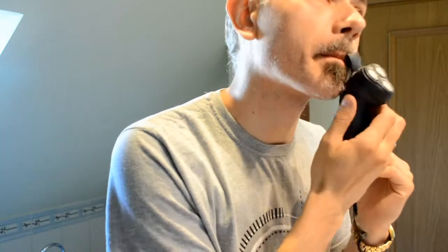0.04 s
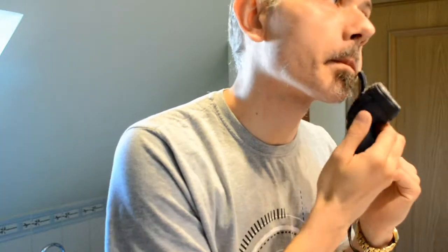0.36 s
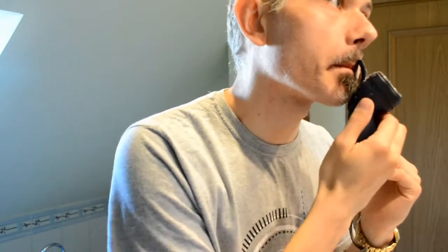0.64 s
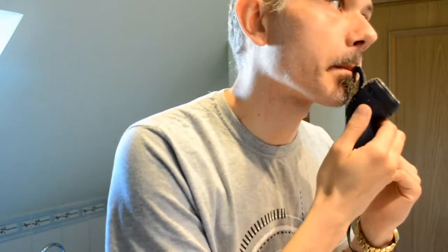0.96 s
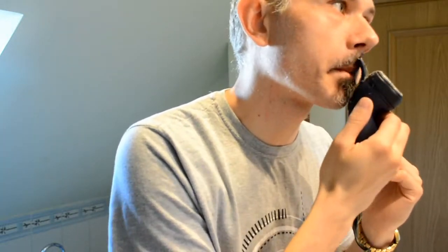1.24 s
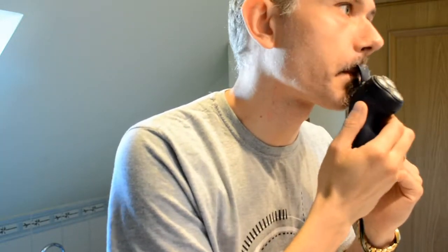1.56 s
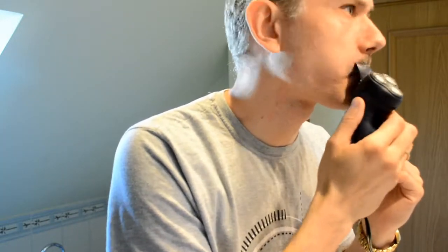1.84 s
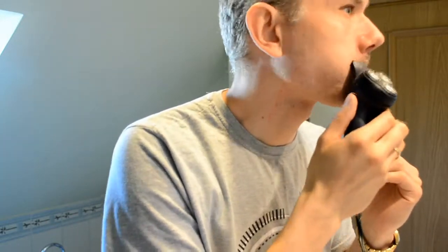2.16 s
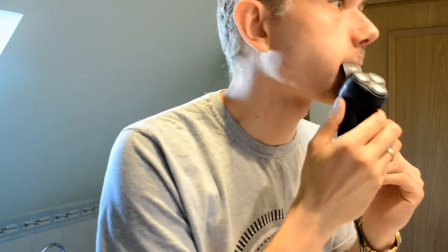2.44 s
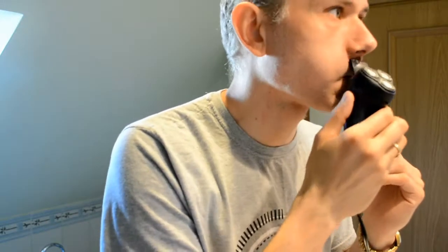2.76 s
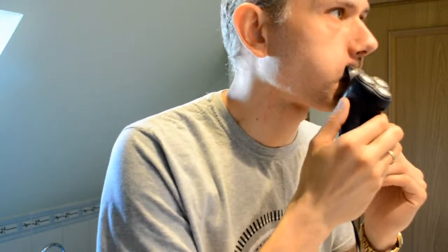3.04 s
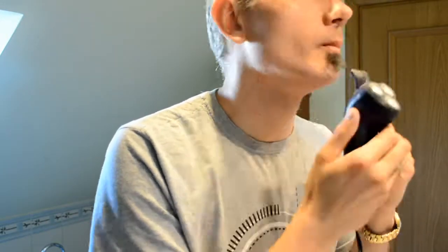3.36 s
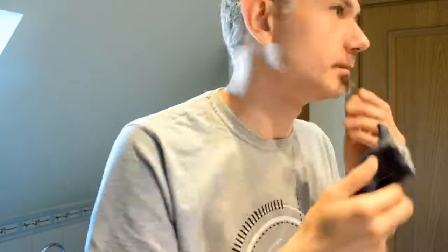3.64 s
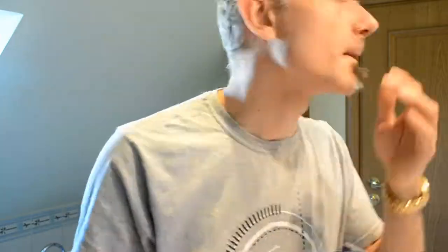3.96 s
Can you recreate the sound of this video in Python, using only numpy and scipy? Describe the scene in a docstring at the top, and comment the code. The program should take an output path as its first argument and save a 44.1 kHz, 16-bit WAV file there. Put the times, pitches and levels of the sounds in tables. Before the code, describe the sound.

An electric shaver buzzes steadily, rasping and crackling as it trims a moustache.

```python
"""An electric shaver trims a moustache in a small tiled room.
Gears and blades clatter in the plastic case, throbbing once a turn; the motor whines in wavering tones.
Short strokes rasp on the skin, hairs crack between the blades, the head bumps the lip.
Near the end the shaver is lifted off and lowered: the rasp dies, resonances shift, the free blades
squeal. Wall reflections widen the treble over a faint room rumble."""
import sys
import numpy as np
from scipy import signal
from scipy.fft import rfft, irfft
from scipy.io import wavfile

SR = 44100
rng = np.random.default_rng(int(sys.argv[2]) if len(sys.argv) > 2 else 0)


def put_to_file(sound):
    """Save the sound as 16-bit audio at rate SR, in the file named by the first command-line argument."""
    columns = np.atleast_2d(sound).T  # one column per channel
    safe = np.clip(columns, -1, 1)
    whole_steps = np.round(safe * 32767)
    wavfile.write(sys.argv[1], SR, whole_steps.astype(np.int16))


N = 176400

TURN_HZ, FIRST_TURN_S = 46.87, .016
CLATTER_PER_S, CHATTER_PER_S = 8000, 290
GEAR_DB, BLADE_DB = -36.5, -47.5
WOBBLE_RATIO, WOBBLE_PER_S = 0.00152, 23.4
JITTER_PER_S, FLUTTER_DB = 166, 1.2
RASP_PER_S, CRACKS_PER_S, SNIP_S = 3000, 5000, 0.0082
BUMP_HZ, BUMP_SPREAD_HZ = 236.3, 20
ROOM_T60_S, ECHO_DB, RUMBLE_DB = 0.13, -15, -80
LOWER_MID_S, LOWER_LENGTH_S, LOWERED_SIDE_DB = 3.66, .1, 2
LOWPASS_HZ = 15700

# Running noise of the gears: freq_hz, gain_db
GEAR_SPECTRUM = [(40, -41.5), (100, -33.5), (160, -23), (280, -17), (420, -20.5), (490, -10), (900, -3),
                 (1300, -7), (1750, 1), (2300, -1.5), (3600, -1), (5000, -10.5), (6500, -18), (15000, -38)]
# Blades sliding on the comb: freq_hz, gain_db
BLADE_SPECTRUM = [(500, -25), (3000, 0.5), (5500, 1.5), (7000, 1.5), (9800, -2), (11500, -7),
                  (13500, -15.5), (15700, -20.5)]
# Resonances of case and cutter: centre_hz, width_hz, gain_db
CASE_PEAKS = [(496, 66, 5.5), (712, 66, 4), (960.5, 47, 6.5), (1099, 89, 7), (1592, 53, 3.5),
              (1710, 79, 7.5), (1875, 100, 3.5), (2998, 130, 7.5), (3820, 120, 3), (4300, 120, 5.5),
              (4720, 320, 4), (5236, 150, 7), (5850, 130, 2.5), (9660, 450, 1)]
# Hollows between them: centre_hz, width_hz, gain_db
CASE_DIPS = [(4125, 310, -5.5), (5680, 480, -3), (7140, 240, -2)]
# Level as the shaver moves: time_s, gear_gain_db, blade_gain_db
DRIVE_GAINS = [(0, 0.5, 2), (.3, .5, -1), (.95, 0.5, 0), (1.95, 0, 0.5), (2.25, .5, -1.5), (3.35, 0, 1),
               (3.56, -0.5, 1), (3.65, 0, -0.5), (3.85, 0, -0.5), (4, -.5, -1.5)]
# Main whine sagging under load, sets relative motor speed: time_s, pitch_hz
WHINE_PITCH = [(0, 1697), (.2, 1716), (.3, 1708), (.4, 1717), (.75, 1700), (.93, 1716), (1.06, 1707),
               (1.16, 1701), (1.36, 1720), (1.6, 1716), (1.71, 1698), (1.82, 1712), (1.96, 1690),
               (2.15, 1702), (2.42, 1715), (2.95, 1702), (3.11, 1698), (3.28, 1728), (3.5, 1714), (4, 1720)]
# Motor and gear tones: mean_pitch_hz, jitter_ratio, [(time_s, level_db)]
MOTOR_TONES = [ (1703, 0.00318, [(0, -45), (.15, -45), (.55, -47), (.68, -41), (1.0, -45), (1.12, -38),
               (1.27, -51), (1.72, -40.5), (1.94, -46), (2.1, -43.5), (2.8, -45.5), (3.2, -41),
               (3.39, -46.5), (3.52, -39), (3.61, -38.5), (3.66, -51), (4, -47)]),
               (3022, .0022, [(0, -47.5), (.32, -44), (.47, -48), (.88, -43), (.96, -51), (1.15, -43.5),
               (1.28, -56), (1.38, -48), (1.8, -45.5), (2.2, -52), (3.2, -53), (3.46, -41.5), (3.57, -43),
               (3.65, -61), (4, -48)]), (1772, 0.0041, [(0, -58), (.3, -46.5), (.7, -52), (2.0, -49),
               (2.3, -45), (2.6, -53), (3.05, -51), (3.27, -49), (3.5, -73), (3.75, -54), (3.9, -47),
               (4, -52)]), (1103, .014, [(0, -54), (1.5, -58), (2.0, -58), (2.2, -48), (2.9, -51),
               (3.1, -69), (3.7, -60), (3.85, -41), (4, -53)]), (3386, 0.00302, [(0, -68), (3.1, -60),
               (3.3, -49), (3.46, -67), (3.55, -41), (3.64, -58), (4, -62)])]
# Comb on skin: freq_hz, gain_db
RASP_SPECTRUM = [(50, -38), (130, -22.5), (160, -23.5), (190, -24.5), (250, -15.5), (330, -22.5),
                 (420, -14), (480, -3.5), (720, -0.5), (1000, -2), (1400, -5), (2500, -6.5), (5000, -19.5),
                 (10000, -21.5), (15000, -45)]
# Strokes through the hair: centre_s, length_s, level_db
RASP_STROKES = [(.065, 0.054, -41), (.16, 0.026, -38), (.305, 0.066, -39), (.45, 0.054, -42.5),
                (.51, 0.033, -41), (.645, 0.072, -38.5), (.74, 0.033, -38.5), (.87, 0.055, -41),
                (1.0, .04, -40), (1.06, 0.065, -40), (1.13, .04, -41), (1.24, .06, -38.5),
                (1.32, .07, -42.5), (1.45, .09, -42), (1.615, 0.084, -40), (1.74, .06, -43),
                (1.87, 0.046, -39), (2.05, 0.064, -49), (2.16, 0.085, -40), (2.275, .06, -43),
                (2.36, 0.034, -43), (2.515, 0.059, -39.5), (2.64, 0.055, -42.5), (2.755, 0.058, -39),
                (2.92, 0.16, -44.5), (3.12, 0.06, -40.5), (3.495, 0.045, -41.5)]
# Light contact between strokes: time_s, level_db
CONTACT_LEVEL = [(0, -51.5), (1.6, -53), (2.0, -50), (3.1, -52), (3.35, -50), (3.58, -44), (3.68, -62),
                 (4, -70)]
# Crack of a cut hair: freq_hz, gain_db
CRACK_SPECTRUM = [(200, -23), (600, 5), (2500, -4.5), (5000, 4), (8000, 3), (10500, -2), (13500, -8),
                  (15700, -37)]
# Tufts being cut: centre_s, level_db
TUFT_SNIPS = [(.06, -44), (.077, -41.5), (.121, -48), (.145, -41), (.161, -44), (.187, -52), (0.255, -41.5),
              (.271, -46), (.292, -44), (.313, -49), (.337, -43), (.423, -46), (.446, -43), (.487, -44),
              (.571, -42), (.612, -44), (.639, -43), (.676, -44), (.739, -46), (1.081, -43), (1.125, -42),
              (1.15, -50), (1.234, -42), (1.257, -49), (1.316, -40), (1.43, -46), (1.449, -44),
              (1.469, -39.5), (1.492, -50), (1.558, -48), (1.58, -43), (1.644, -42), (1.695, -46),
              (1.75, -47), (1.874, -42), (1.913, -44), (2.007, -44), (2.041, -48), (2.124, -46),
              (2.151, -43), (2.253, -41), (2.346, -41.5), (2.364, -44), (2.38, -48), (2.465, -45),
              (2.492, -45), (2.511, -41.5), (2.618, -42.5), (2.772, -45), (2.79, -48), (2.914, -46),
              (2.955, -46), (3.49, -43), (3.538, -49)]
# Fine crackle of stubble: time_s, level_db
STUBBLE_LEVEL = [(0, -61), (.28, -51), (.4, -60), (.8, -50), (1.1, -53), (1.65, -53), (1.95, -51.5),
                 (2.5, -51.5), (3.2, -56), (3.5, -61), (3.68, -64), (4, -70)]
# Room rumble: freq_hz, gain_db
RUMBLE_SPECTRUM = [(20, -1), (60, 4), (150, 8), (500, -14), (15000, -45)]
# Diffuse relative to direct sound: freq_hz, gain_db
DIFFUSE_SPECTRUM = [(60, -9), (150, -11), (380, -8.5), (490, -19.5), (1000, -26), (1300, -18.5),
                    (1650, -39), (1950, -15.5), (2950, -23.5), (3500, -14.5), (4500, -16), (6500, -10.5),
                    (9000, -8), (12000, -3.3), (15000, -4)]
# Head against lip: centre_s, length_s, level_db
LIP_BUMPS = [(.16, 0.032, -61), (.46, 0.027, -65), (1.23, .04, -71), (2.15, 0.032, -66),
             (3.477, 0.022, -51.5)]
# Resonance shifts once turned over and lowered: centre_hz, width_hz, gain_db
LOWERED_PEAKS = [(593, 270, -3), (3020, 160, -1), (4150, 210, 2), (4600, 400, -3.5), (5700, 450, 7),
                 (7050, 400, 1), (7850, 700, -1.5)]
# Squeal of the free blades: time_s, pitch_hz, level_db
SQUEAL_PATH = [(3.6, 2930, -80), (3.72, 2830, -57), (3.78, 2810, -53), (3.82, 2693, -46),
               (3.88, 2740, -40.5), (4, 2700, -47)]

TIME_S = np.arange(N) / SR
FREQ_HZ = np.arange(N // 2 + 1) * SR / N


def undb(db):
    """Decibels to gain."""
    return 10 ** (np.asarray(db) / 20)


def unit_rms(x):
    """Scale to rms 1."""
    return x / np.sqrt(np.mean(x ** 2))


def curve(rows, column=1):
    """Table column, linearly interpolated in time."""
    rows = np.array(rows, float)
    return np.interp(TIME_S, rows[:, 0], rows[:, column])


def wander(rate_per_s):
    """Smooth noise, rms 1, about rate_per_s new values a second."""
    spectrum = rfft(rng.standard_normal(N))
    return unit_rms(irfft(spectrum / (1 + (2 * FREQ_HZ / rate_per_s) ** 4), N))


def colour(x, spectrum, peaks=()):
    """Minimum-phase filter: spectral envelope plus resonances."""
    freq_hz, gain_db = np.array(spectrum, float).T
    response_db = np.interp(np.log(FREQ_HZ + 1), np.log(freq_hz), gain_db)
    for centre_hz, width_hz, peak_db in peaks:
        response_db += peak_db / (1 + (2 * (FREQ_HZ - centre_hz) / width_hz) ** 2)
    cepstrum = irfft(np.log(undb(response_db)), N)
    cepstrum[1:N // 2] *= 2  # fold to causal
    cepstrum[N // 2 + 1:] = 0
    return irfft(rfft(x) * np.exp(rfft(cepstrum)), N)


def clicks(rate_per_s, spread_db):
    """Dense tiny impacts of uneven size."""
    size = undb(spread_db * np.clip(rng.standard_normal(N), -2, 2))
    hits = rng.random(N) < rate_per_s / SR
    polarity = np.sign(rng.standard_normal(N))
    return unit_rms(hits * size * polarity)


def swells(rows):
    """Gain of bell-shaped swells summed in power; length_s is the half-power width."""
    power = np.zeros(N)
    for centre_s, length_s, level_db in rows:
        offset_s = TIME_S - centre_s
        near = np.abs(offset_s) < 2 * length_s
        power[near] += undb(level_db) ** 2 * .5 ** ((2 * offset_s[near] / length_s) ** 2)
    return np.sqrt(power)


def throb(depth):
    """Gain of the drive bearing harder once a turn."""
    return 1 + depth * np.cos(2 * np.pi * TURN_HZ * (TIME_S - FIRST_TURN_S))


def drive_clatter():
    """Gear teeth and blades rattle the case, chattering together; lowering shifts the resonances."""
    chatter = wander(CHATTER_PER_S)

    def rattle(spectrum, spread_db, throb_depth, chatter_db):
        impacts = clicks(CLATTER_PER_S, spread_db) * throb(throb_depth) * undb(chatter_db * chatter)
        return unit_rms(colour(impacts, spectrum, CASE_PEAKS + CASE_DIPS))

    gears = rattle(GEAR_SPECTRUM, spread_db=3.5, throb_depth=0.19, chatter_db=0.62)
    blades = rattle(BLADE_SPECTRUM, spread_db=3, throb_depth=0.18, chatter_db=1.9)
    gears *= undb(GEAR_DB + curve(DRIVE_GAINS))
    blades *= undb(BLADE_DB + curve(DRIVE_GAINS, column=2))
    at_face = gears + blades
    lowered = colour(at_face, [(1, 0)], LOWERED_PEAKS)  # flat envelope
    return at_face * (1 - lowering()) + lowered * lowering()


def tone(pitch_hz, level_db, jitter_ratio):
    """Sine shaken in pitch and level by play in the gears."""
    shaken_hz = pitch_hz * (1 + jitter_ratio * wander(JITTER_PER_S))
    phase = 2 * np.pi * np.cumsum(shaken_hz) / SR
    flutter = undb(FLUTTER_DB * wander(JITTER_PER_S))
    return unit_rms(np.sin(phase) * flutter) * undb(level_db)


def motor_whine():
    """Motor and gear tones tracking one wavering speed."""
    pitch_hz = curve(WHINE_PITCH)
    speed_ratio = pitch_hz / pitch_hz.mean() + WOBBLE_RATIO * wander(WOBBLE_PER_S)
    return sum(tone(mean_hz * speed_ratio, curve(levels), jitter_ratio)
               for mean_hz, jitter_ratio, levels in MOTOR_TONES)


def comb_rasp():
    """Comb scrapes the skin: strong in strokes, light between."""
    friction = clicks(RASP_PER_S, spread_db=3) * throb(depth=0.33)
    rasp = unit_rms(colour(friction, RASP_SPECTRUM, CASE_PEAKS))
    return rasp * np.hypot(swells(RASP_STROKES), undb(curve(CONTACT_LEVEL)))


def hair_cracks():
    """Hair cracks between the blades: tufts snip, stubble crackles."""
    cuts = clicks(CRACKS_PER_S, spread_db=8)
    cracks = unit_rms(colour(cuts, CRACK_SPECTRUM, CASE_PEAKS + CASE_DIPS))
    snips = swells([(centre_s, SNIP_S, level_db) for centre_s, level_db in TUFT_SNIPS])
    return cracks * np.hypot(snips, undb(curve(STUBBLE_LEVEL)))


def room_rumble():
    """Faint, steady low noise."""
    return undb(RUMBLE_DB) * unit_rms(colour(rng.standard_normal(N), RUMBLE_SPECTRUM))


def tile_echoes(x):
    """Dense, fast-fading wall reflections, starting after 3 ms."""
    delay_s = np.arange(SR // 2) / SR
    decay = np.exp(-np.log(1000) * delay_s / ROOM_T60_S)
    tail = rng.standard_normal(len(delay_s)) * decay * (delay_s > .003)
    tail /= np.sqrt(np.sum(tail ** 2))
    return undb(ECHO_DB) * irfft(rfft(x) * rfft(tail, N), N)


def lip_bumps():
    """Head bumps the lip: soft thuds of unsteady pitch."""
    pitch_hz = BUMP_HZ + BUMP_SPREAD_HZ * wander(rate_per_s=113)
    phase = 2 * np.pi * np.cumsum(pitch_hz) / SR
    return unit_rms(np.sin(phase)) * swells(LIP_BUMPS)


def lowering():
    """Shaver position: 0 at the face, 1 lowered."""
    return np.clip((TIME_S - LOWER_MID_S) / LOWER_LENGTH_S + .5, 0, 1)


def blade_squeal():
    """Blades run free: a squeal slides down and settles."""
    return tone(curve(SQUEAL_PATH), curve(SQUEAL_PATH, column=2), jitter_ratio=0.0022)


def scene():
    """Shaver in the centre; diffuse wall sound at the sides, stronger once lowered."""
    # same noise layers, independent draws
    direct, diffuse = (drive_clatter() + comb_rasp() + hair_cracks() + room_rumble() for _ in range(2))
    mid = direct + tile_echoes(direct) + motor_whine() + blade_squeal() + lip_bumps()
    side = colour(diffuse, DIFFUSE_SPECTRUM) * undb(LOWERED_SIDE_DB * lowering())
    return np.array([mid + side, mid - side])


def record(dry):
    """Steep elliptic low-pass."""
    return signal.sosfilt(signal.ellip(10, .1, 80, LOWPASS_HZ, fs=SR, output="sos"), dry)


dry = scene()
out = record(dry)
put_to_file(out)
```